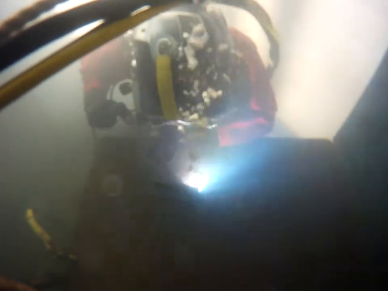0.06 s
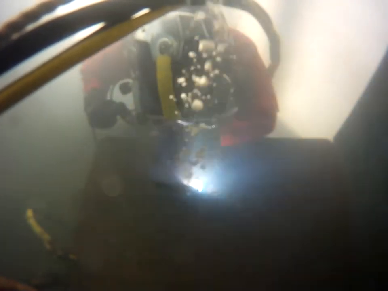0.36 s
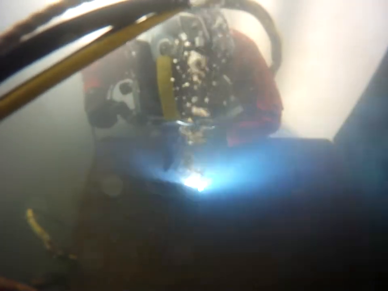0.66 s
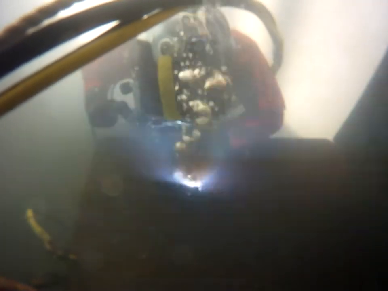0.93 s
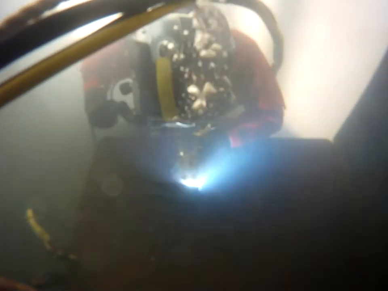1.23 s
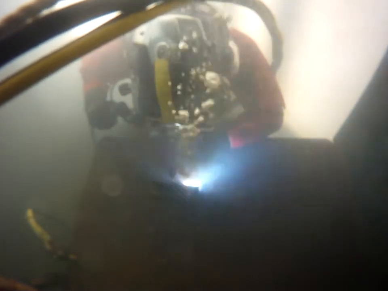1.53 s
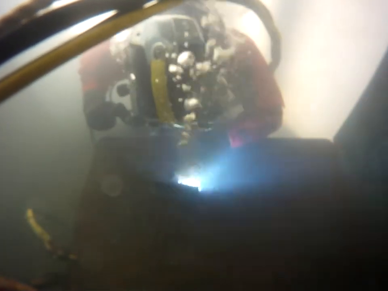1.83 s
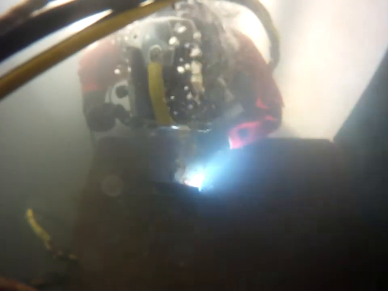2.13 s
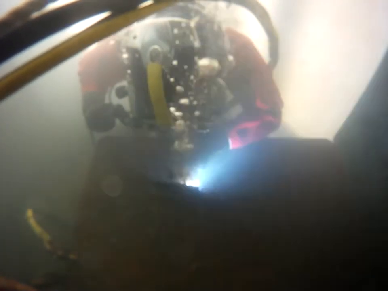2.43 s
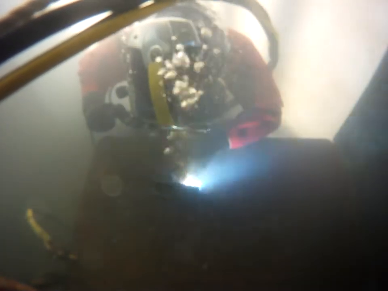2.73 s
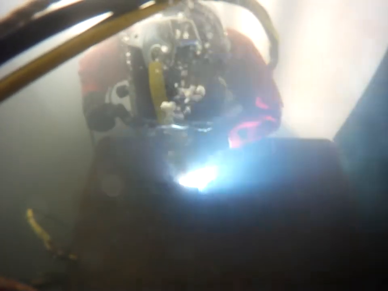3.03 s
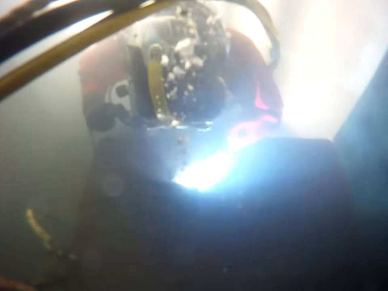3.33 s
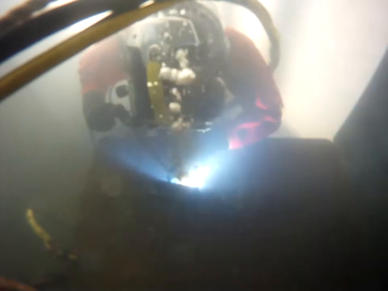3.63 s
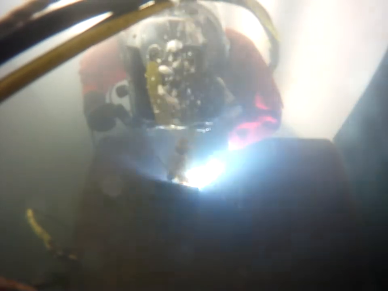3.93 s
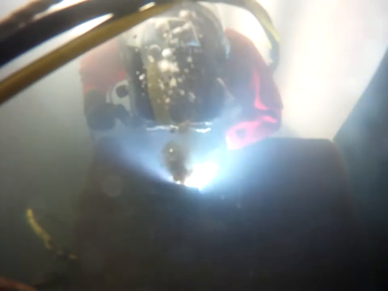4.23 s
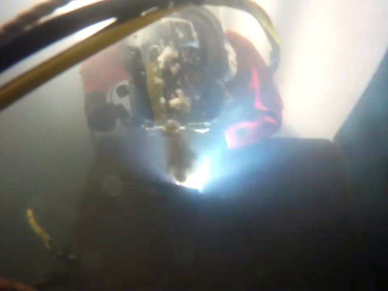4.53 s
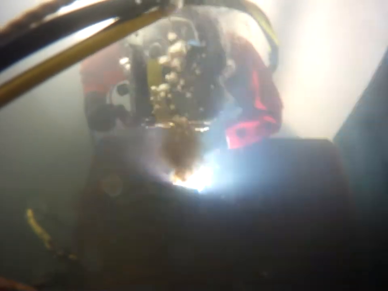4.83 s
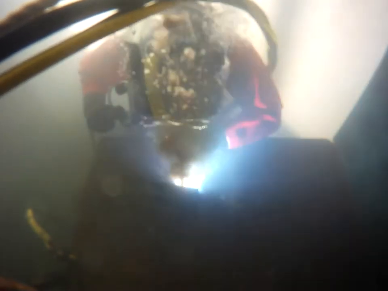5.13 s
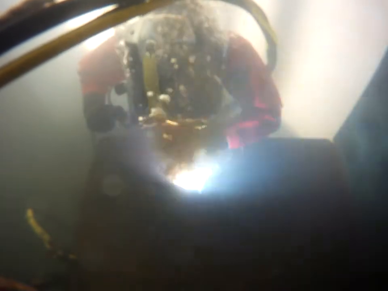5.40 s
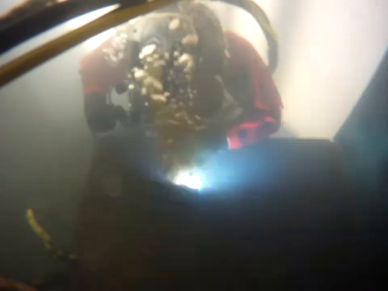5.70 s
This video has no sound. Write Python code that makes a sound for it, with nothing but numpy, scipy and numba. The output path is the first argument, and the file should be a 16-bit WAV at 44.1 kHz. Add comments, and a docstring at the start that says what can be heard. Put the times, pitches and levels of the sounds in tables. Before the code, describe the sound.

A diver's welding arc boils the water in a tank, heard from a submerged microphone about a metre away. Hollow gurgling runs throughout, with deep gulps, ringing single bubbles, a fine fizz and a low rumble. Two loud gas pops come early, each briefly ducking the sound. Sharp snaps and short splutters cut in irregularly, the strongest later on, while faint ticks and a glassy sizzle sit on top.

```python
"""A welding arc boils the water in a tank, where a diver works a metre from a submerged camera.
Big gas pockets gulp, bubbles ring and keep the arc's cavity humming, and fine ones fizz, all coloured
by the tank's resonances, while the plume rumbles below. Sharp snaps and short splutters cut in, several
like distortion clicks on loud bubbles, and faint, bright ticks cluster like a limiter's crackle.
Twice a gas pocket pops and the camera's limiter ducks. Its coarse sampling adds a glassy sizzle."""
import sys
import numpy as np
from scipy import signal
from scipy.fft import rfft, irfft, next_fast_len
from scipy.io import wavfile
from numba import njit

SR = 44100
rng = np.random.default_rng(int(sys.argv[2]) if len(sys.argv) > 2 else 0)


def generate_wav(signal):
    """Clip the signal to [-1, 1] and save it as 16-bit WAV at the path in sys.argv[1]."""
    frames = np.transpose(np.atleast_2d(signal))
    scaled = np.clip(frames, -1, 1) * 32767
    pcm = np.round(scaled).astype(np.int16)
    wavfile.write(sys.argv[1], SR, pcm)


N = 262836
TIME = np.arange(N) / SR

# how hard the arc boils the water, as the fader of its fizz: (time [s], level [dB])
BOIL_LEVEL = [(0.0, -40.5), (0.16, -45), (0.2, -38), (0.52, -41.5), (1.48, -40.5), (1.52, -44), (2.04, -38),
              (2.4, -44.5), (2.52, -39.5), (3.48, -37), (3.88, -45.5), (5.0, -42), (5.16, -37),
              (5.28, -40.0), (5.4, -35.0), (5.48, -42), (5.64, -39), (5.96, -44.5)]
# surges of big gas pockets: (time [s], level [dB])
POCKET_SURGES = [(0.0, -43), (0.24, -21), (0.52, -30.5), (0.88, -23), (2.0, -28), (3.6, -21), (3.76, -24.5),
                 (5.28, -21.5), (5.48, -22), (5.96, -25.5)]
# the gas cavity around the arc: (time [s], pitch [Hz], relative level [dB])
CAVITY_RING = [(0, 310, -9), (.3, 339, -1.5), (1.0, 315, 1), (1.45, 296, -2), (2.1, 312, -3),
               (2.8, 294, -5), (3.75, 312, -6.5), (4.35, 262, 3), (4.65, 282, -1), (5.0, 247, 1),
               (5.96, 256, -6)]
# the loudest single bubbles: (time [s], pitch [Hz], relative level [dB], t60 [s])
SOLO_BUBBLES = [(0.047, 341, -5, 0.1), (0.195, 1689, -18.5, 0.03), (0.28, 812, -17.5, 0.056),
                (0.503, 316, -2, 0.029), (0.717, 341.6, -6, 0.18), (0.799, 388, 0.5, 0.028),
                (1.429, 2535, -24, 0.037), (1.488, 395, 0, 0.018), (2.057, 320, -9, 0.07),
                (2.219, 592.6, -11, 0.24), (2.278, 299.5, -2, 0.086), (2.552, 440.7, -10, 0.2),
                (2.569, 2100, -20.5, 0.06), (2.576, 706, -13.5, 0.05), (3.382, 114, -4.5, 0.036),
                (3.621, 213, 0, 0.035), (3.744, 320, -5.5, 0.22), (3.828, 287, -1.5, 0.096),
                (4.066, 393.6, 0, 0.078), (4.167, 206, -4, 0.044), (4.275, 432.3, -8, 0.17),
                (4.377, 265.3, -5, 0.26), (4.554, 280.8, -7, 0.27), (4.65, 287, -1.5, 0.05),
                (4.845, 481, -6.5, 0.068), (4.872, 260.5, -8, 0.22), (5.025, 243.4, -6, 0.14),
                (5.151, 118, -11.5, 0.37), (5.427, 245, -4, 0.094), (5.789, 221, -2.5, 0.036),
                (5.926, 218, 0, 0.028)]
# gas pockets popping at the electrode: (time [s], pitch [Hz], level [dB], swell time [s])
GAS_POPS = [(1.027, 321, 12.5, 0.004), (1.6193, 336, 11.5, 0.0019)]
# sharp snaps and short splutters: (time [s], splutter level [dB], splutter t60 [s], snap level [dB])
SNAPS = [(.795, -28.5, 0.079, -55), (1.028, -28, 0.018, -35), (1.621, -19, 0.023, -35),
         (2.048, -26, 0.059, -49), (2.16, -28.5, .04, -45), (2.284, -30, .04, -41), (2.526, -39, .03, -44),
         (3.768, -43, 0.033, -42), (4.04, -32.5, 0.11, -52), (4.177, -31.5, 0.11, -63),
         (4.372, -34, 0.14, -55), (4.6374, -19, 0.085, -30.5), (5.788, -35, 0.027, -45)]
# tone of the splutters: (frequency [Hz], gain [dB])
SPLUTTER_EQ = [(300, -22), (900, 8.5), (1300, 10.5), (2400, 5.5), (3400, -13), (5000, -19.5), (6000, -34)]
# the tank rumbling under the plume: (time [s], relative level [dB])
RUMBLE_LEVEL = [(0, -47), (0.6, -44.5), (1.7, -48.5), (2.6, -37), (3.0, -44), (3.4, -42), (3.8, -42.5),
                (5.3, -37.5), (5.96, -44)]
# the path through water and camera housing: (frequency [Hz], gain [dB])
WATER_EQ = [(45, -23.5), (60, -19.5), (90, -14), (190, -8), (290, -0.5), (450, 1.5), (505, -13),
            (560, -11.5), (700, -17), (790, -32), (1000, -35.5), (1850, -31), (2700, -31.5), (4000, -48.5),
            (5200, -45), (6000, -60.5)]
# resonances of tank and housing: (frequency [Hz], width [Hz], boost [dB])
TANK_MODES = [(117.3, 8.7, 11), (382.2, 9.2, 5), (591.4, 51, 5), (868.4, 60, 12.5), (1172, 47, 13.5),
              (1266, 41, 7.5), (1435, 67, 7), (2068, 93, 11.5), (2270, 59, 7), (2532, 44, 7.5),
              (3464, 77, 11), (4800, 110, 1)]


def boiling(boil_db):
    """The arc's gurgle: big pockets surge, smaller bubbles ride the boil, medium ones ring the cavity."""
    pocket_db, = curves(POCKET_SURGES)
    swell_db = boil_db - boil_db.mean()
    pockets = swarm(lo_hz=89.5, hi_hz=206.6, per_s=200, cycles=5.1, scatter_db=1.0, rise=0.057)
    medium = swarm(lo_hz=199.1, hi_hz=493, per_s=260, cycles=17.3, scatter_db=1.27, rise=0.042)
    small = swarm(lo_hz=483, hi_hz=952.5, per_s=480, cycles=23.7, scatter_db=2.25, rise=0.041)
    glugs = swarm(lo_hz=228.8, hi_hz=729.6, per_s=24, cycles=38.6, scatter_db=1.5, rise=0.026)
    gurgle = (undb(-20.5) * medium + undb(-27) * glugs) * undb(0.31 * swell_db)
    hum = undb(-18.5) * cavity(medium, width_hz=14)
    return pockets * undb(pocket_db) + gurgle + hum + small * undb(-25 + 0.57 * swell_db)


def bubble(hz, t60, rise):
    """A bubble pinches off and rings down, peak 1; its pitch lifts by the share `rise` as it floats up."""
    t = np.arange(int(t60 * SR)) / SR
    age = np.log(1000) * t / t60
    envelope = (np.exp(-age) - np.exp(-4 * age)) / .47
    return envelope * np.sin(2 * np.pi * hz * t * (1 + rise * t / t60 / 2))


def swarm(lo_hz, hi_hz, per_s, cycles, scatter_db, rise):
    """A stream of bubbles, each ringing for about `cycles` periods, heard through the tank; rms 1."""
    out = np.zeros(N)
    for k, (late, pitch, length, force) in enumerate(rng.random((int(per_s * N / SR), 4))):
        start = (k + 4 * late - 2) / per_s
        hz = lo_hz * (hi_hz / lo_hz) ** pitch
        t60 = cycles * (.5 + length) / hz
        accent_db = -scatter_db * np.log(1 - .98 * force)  # most are soft, a few stand out
        add(out, start, hz * undb(accent_db) * bubble(hz, t60, rise))
    return unit(colour(band(out, lo_hz, hi_hz), WATER_EQ, TANK_MODES))


def cavity(push, width_hz):
    """The gas cavity around the arc rings when bubbles leave it; its pitch sinks as it grows."""
    hz, db = curves(CAVITY_RING)
    carrier = np.exp(2j * np.pi * np.cumsum(hz) / SR)
    pole = np.exp(-np.pi * width_hz / SR)
    # shift down, low-pass, shift back: a resonance that glides with the pitch
    ring = carrier * signal.lfilter([1 - pole], [1, -pole], push / carrier)
    return unit(ring.real) * undb(db)


def solo_bubbles():
    """Single bubbles ring out above the stream."""
    out = np.zeros(N)
    for start, hz, db, t60 in SOLO_BUBBLES:
        add(out, start, undb(db - 2) * bubble(hz, t60, rise=0.016))
    return out


def pops():
    """A gas pocket bursts: a few violent swings that build up and die at once."""
    out, t = np.zeros(N), np.arange(SR // 10) / SR
    for start, hz, db, swell_s in GAS_POPS:
        envelope = (t / swell_s * np.exp(1 - t / swell_s)) ** 2
        add(out, start, -undb(db) * envelope * np.sin(2 * np.pi * hz * t))
    return out


def snaps(snap_t60=0.048):
    """Sharp snaps over short, duller splutters; several sound like distortion clicks on loud bubbles."""
    splutter_env, snap_env = np.zeros(N), np.zeros(N)
    for start, splutter_db, splutter_t60, snap_db in SNAPS:
        add(splutter_env, start, undb(splutter_db) * decay(splutter_t60))
        add(snap_env, start, undb(snap_db) * decay(snap_t60))
    dull_noise = unit(colour(rng.standard_normal(N), SPLUTTER_EQ))
    return splutter_env * dull_noise + snap_env * noise(2000, 5330)


def fizz(boil_db):
    """Thousands of tiny bubbles a second merge into a fizz that swells with the boil; a few ping out."""
    coarse = swarm(lo_hz=925, hi_hz=1810, per_s=1100, cycles=29, scatter_db=3.0, rise=0.036)
    fine = swarm(lo_hz=1809, hi_hz=5645, per_s=3400, cycles=47, scatter_db=3.5, rise=0.025)
    pings = swarm(lo_hz=1497, hi_hz=2700, per_s=7, cycles=60, scatter_db=1.0, rise=0.02)
    return undb(boil_db) * (undb(3) * coarse + undb(-2) * fine + undb(-13) * pings)


def crackle(boil_db, per_s=1200):
    """Faint, bright ticks in irregular clusters, like a limiter's crackle; louder as the boil swells."""
    clusters = undb(1.6 * np.clip(noise(6.6, 26), -2, 2))
    accents = undb(np.minimum(rng.exponential(size=N), np.pi))
    ticks = (rng.random(N) < per_s / SR) * accents * clusters
    level_db = -55.5 + 1.15 * (boil_db - boil_db.mean())
    return undb(level_db) * unit(band(smear(ticks, t60=0.018), 2200, 5320))


def rumble():
    """The low bed: the rising plume heaves the water and shakes the tank, and its largest pockets thud."""
    db, = curves(RUMBLE_LEVEL)
    heave = noise(26, 34)
    thuds = swarm(lo_hz=55, hi_hz=94.4, per_s=120, cycles=3.9, scatter_db=3.5, rise=0.074)
    return (heave + undb(7.5) * thuds) * undb(db)


def smear(x, t60):
    """Give every tick a short, dense tail; rms 1."""
    envelope = decay(t60)
    tail = rng.standard_normal(len(envelope)) * envelope
    return unit(signal.fftconvolve(x, tail)[:N])


def colour(x, eq, modes=()):
    """Filter by an EQ curve with resonant peaks standing on it."""
    size = next_fast_len(N + SR // 2)
    f = np.maximum(np.fft.rfftfreq(size, 1 / SR), 1)
    hz, db = np.transpose(eq)
    response = undb(np.interp(np.log(f), np.log(hz), db))
    for centre, width, boost_db in modes:
        detune = (f / centre - centre / f) * centre / width
        response = response * (1 + (undb(boost_db) - 1) / (1 + 1j * detune))
    return irfft(rfft(x, size) * response, size)[:N]


def band(x, lo_hz, hi_hz):
    """Steep band-pass."""
    return signal.sosfilt(signal.butter(6, [lo_hz, hi_hz], "band", fs=SR, output="sos"), x)


def noise(lo_hz, hi_hz):
    """A band of noise; rms 1."""
    return unit(band(rng.standard_normal(N), lo_hz, hi_hz))


def decay(t60):
    """A 0.2 s envelope that falls 60 dB every t60 seconds."""
    t = np.arange(SR // 5) / SR
    return np.exp(-np.log(1000) * t / t60)


def curves(table):
    """Join timed breakpoints by straight lines; one curve for each column after the time."""
    times, *columns = np.transpose(table)
    return [np.interp(TIME, times, column) for column in columns]


def add(out, start, sound):
    """Mix a sound in at a time in seconds."""
    i = int(np.clip(start * SR, 0, N - 1))
    out[i:i + len(sound)] += sound[:N - i]


def undb(db):
    """Decibels to gain."""
    return 10 ** (np.asarray(db) / 20)


def unit(x):
    """Scale to rms 1."""
    return x / np.sqrt(np.mean(x ** 2))


@njit
def limiter(x, ceiling, attack_s, hold_s, release_db_per_s):
    """Duck while the output overshoots, hold, then let the gain climb back."""
    y, gain, wait = np.empty(len(x)), 1., 0.
    climb = 10 ** (release_db_per_s / 20 / SR)
    for i in range(len(x)):
        y[i] = gain * x[i]
        if abs(y[i]) > ceiling:
            gain *= (ceiling / abs(y[i])) ** (1 / (attack_s * SR))
            wait = hold_s
        elif wait > 0:
            wait -= 1 / SR
        else:
            gain = min(1., gain * climb)
    return y


def scene():
    """The mono mix: gurgle, fizz and crackle ride the gulping boil over the rumble; accents on top."""
    boil_db, = curves(BOIL_LEVEL)
    boil_db += 1.16 * noise(4.03, 12.2)  # gas leaves in gulps several times a second
    bed = rumble() + boiling(boil_db) + fizz(boil_db) + crackle(boil_db)
    return (bed + solo_bubbles() + pops() + snaps())[None]


def record(dry):
    """The camera limits, samples coarsely, clips peaks and holds each sample, adding a glassy sizzle."""
    camera_hz, top_hz, repeats = 12000, 15300, 4
    limited = limiter(dry[0], ceiling=0.46, attack_s=0.0023, hold_s=0.088, release_db_per_s=113.0)
    coarse = np.clip(signal.resample_poly(limited, camera_hz, SR), -.95, .95)
    held = np.repeat(coarse, repeats)  # mirrors the spectrum around the camera's sampling rate
    glassy = signal.resample_poly(held, SR, repeats * camera_hz)[:N]
    high_cut = signal.ellip(12, .1, 100, top_hz, fs=SR, output="sos")
    return signal.sosfilt(high_cut, glassy)[None]


dry = scene()
out = record(dry)
generate_wav(out)
```